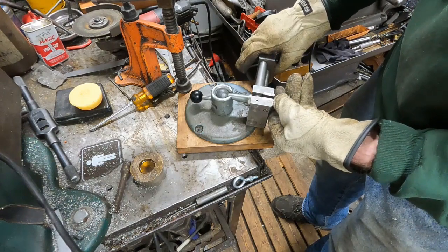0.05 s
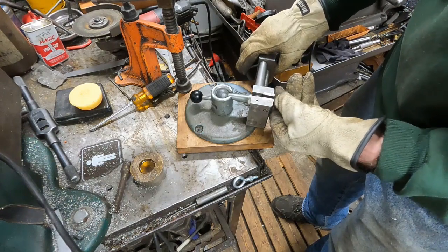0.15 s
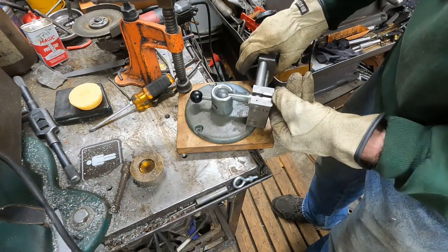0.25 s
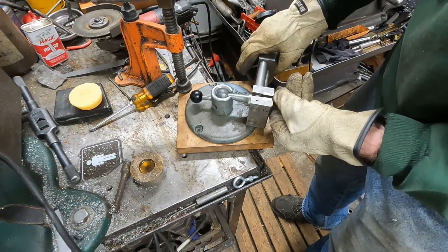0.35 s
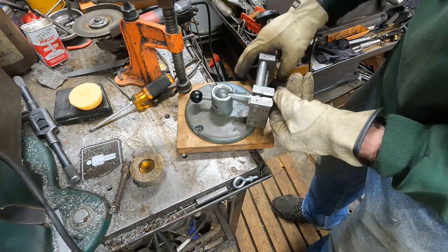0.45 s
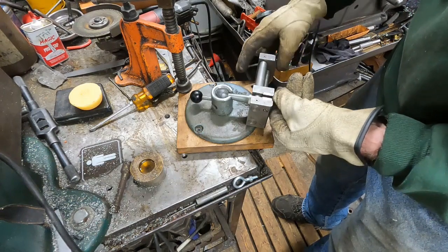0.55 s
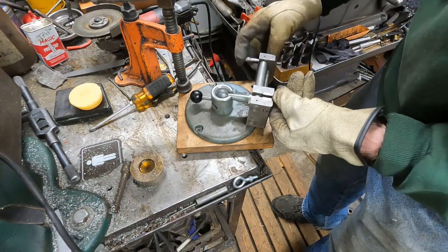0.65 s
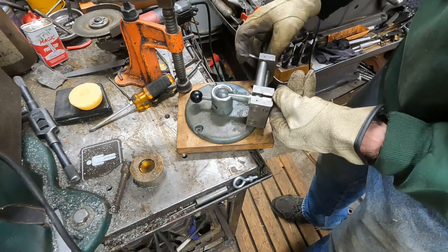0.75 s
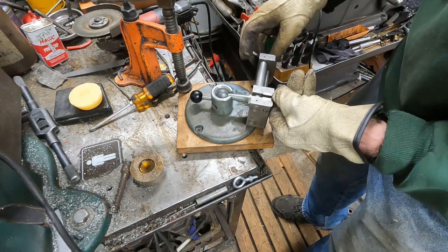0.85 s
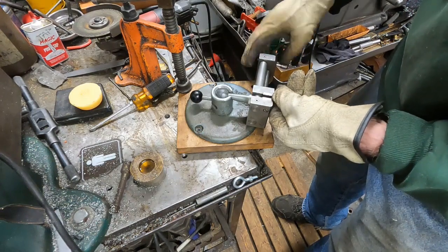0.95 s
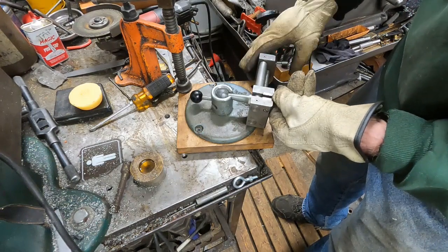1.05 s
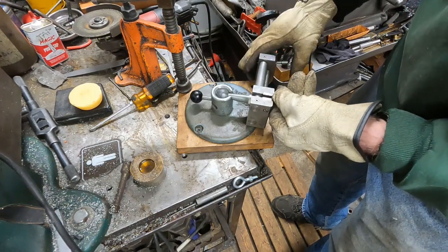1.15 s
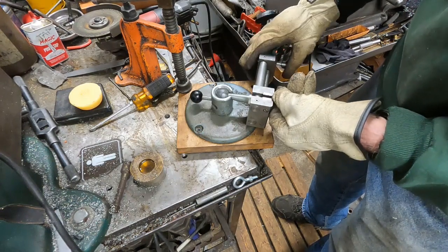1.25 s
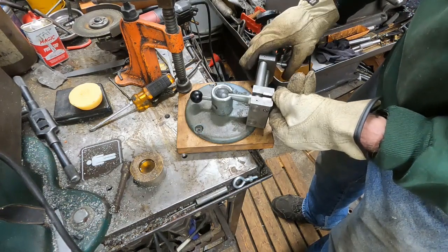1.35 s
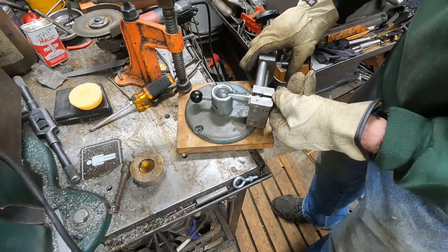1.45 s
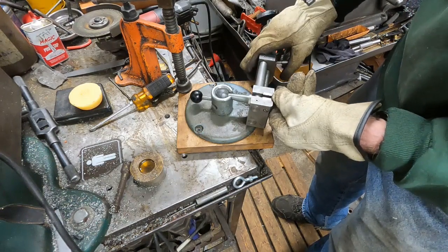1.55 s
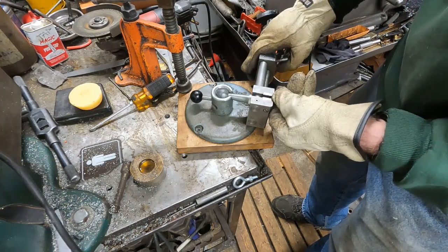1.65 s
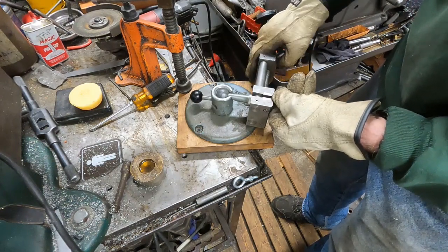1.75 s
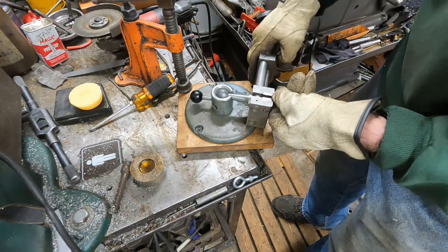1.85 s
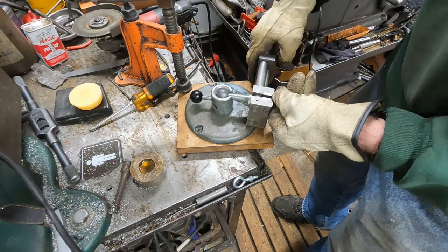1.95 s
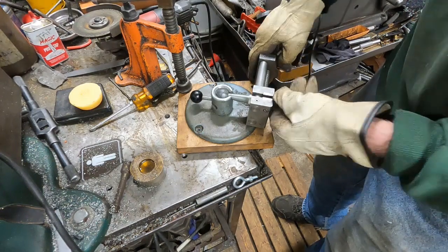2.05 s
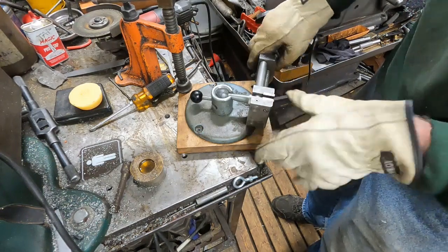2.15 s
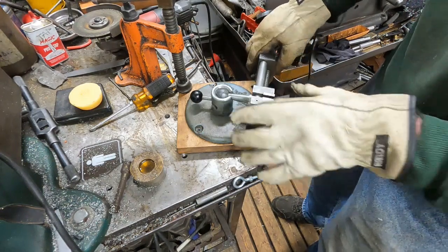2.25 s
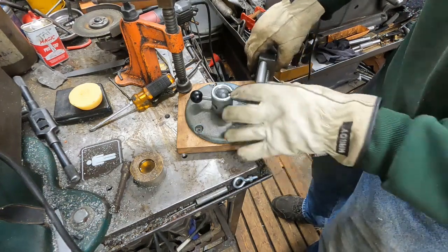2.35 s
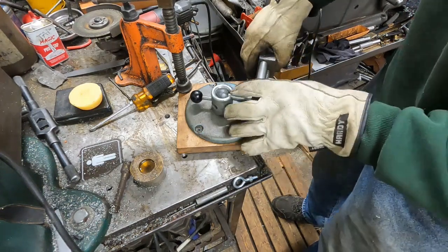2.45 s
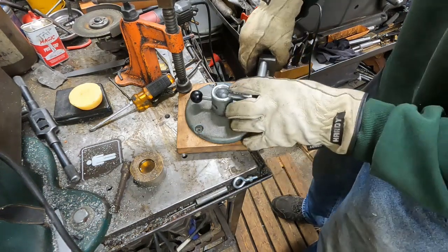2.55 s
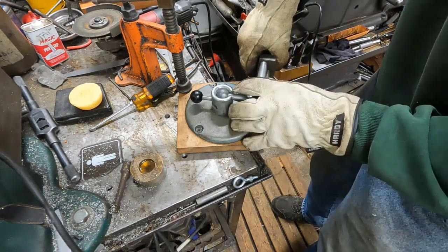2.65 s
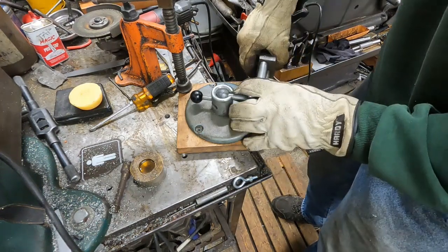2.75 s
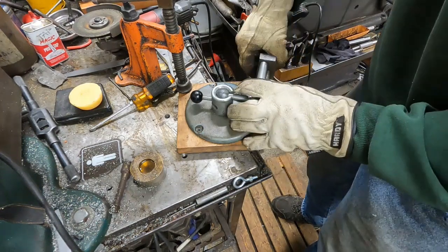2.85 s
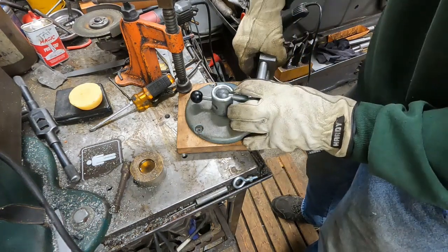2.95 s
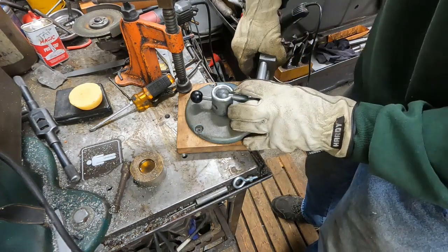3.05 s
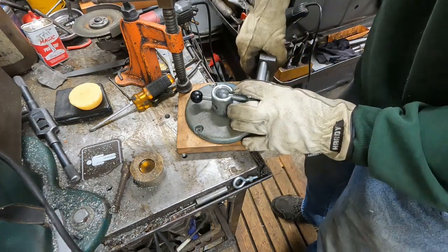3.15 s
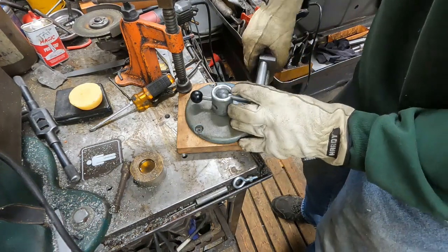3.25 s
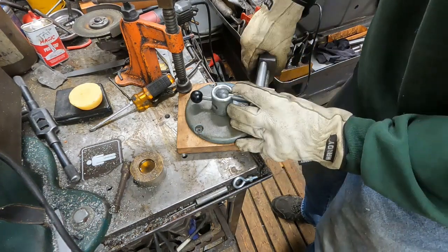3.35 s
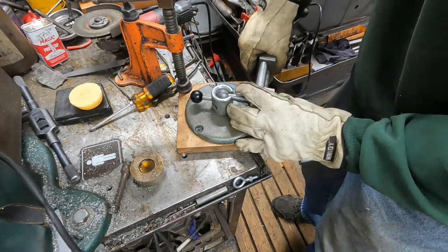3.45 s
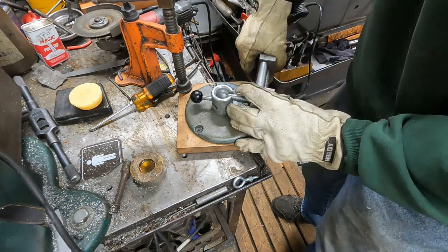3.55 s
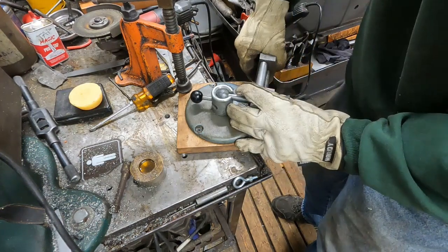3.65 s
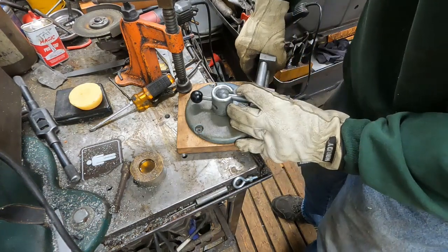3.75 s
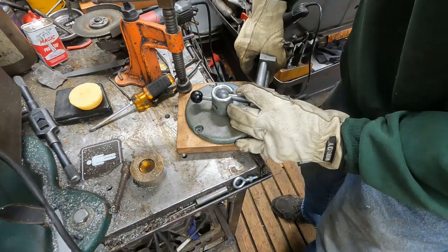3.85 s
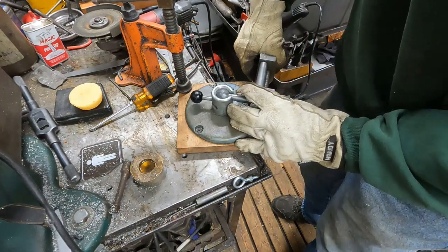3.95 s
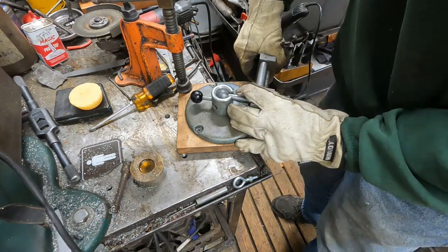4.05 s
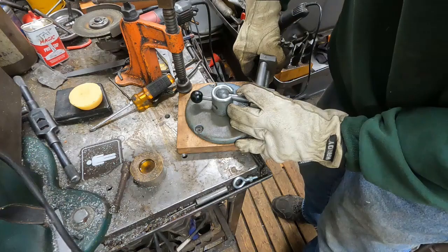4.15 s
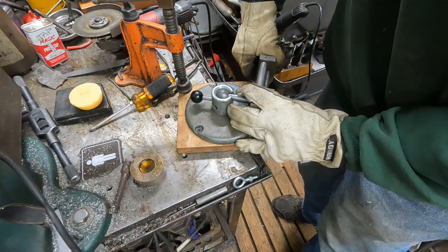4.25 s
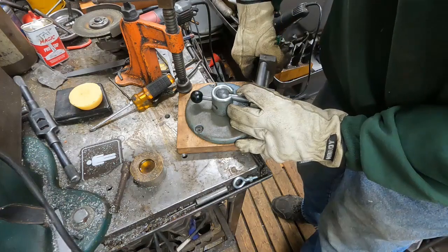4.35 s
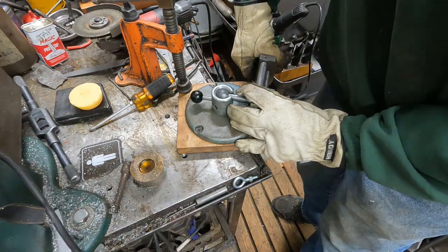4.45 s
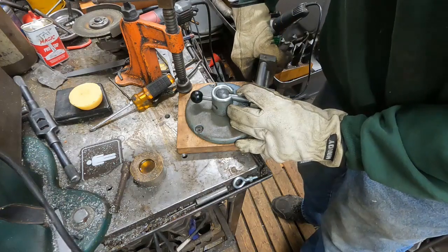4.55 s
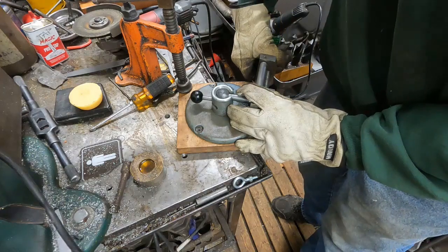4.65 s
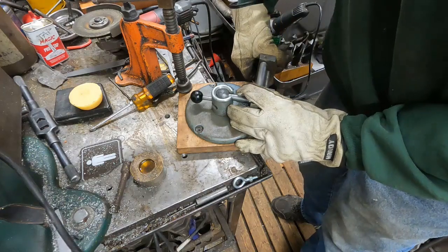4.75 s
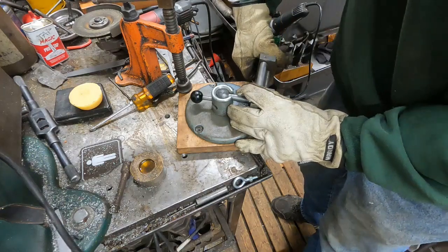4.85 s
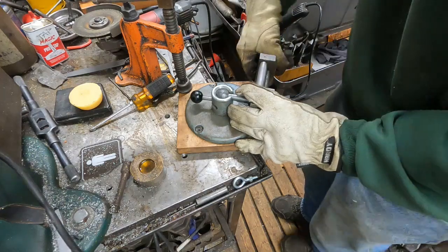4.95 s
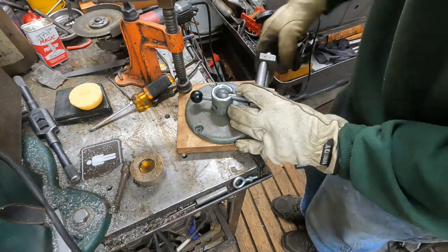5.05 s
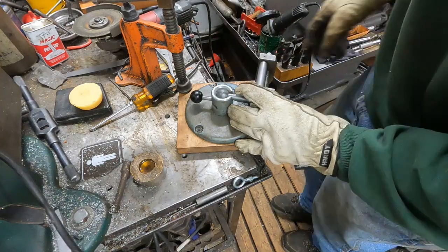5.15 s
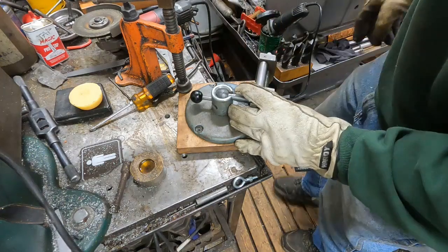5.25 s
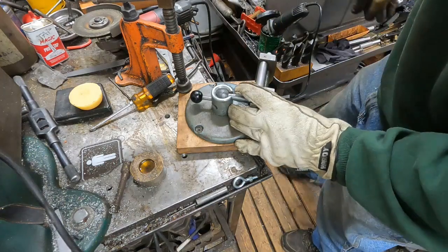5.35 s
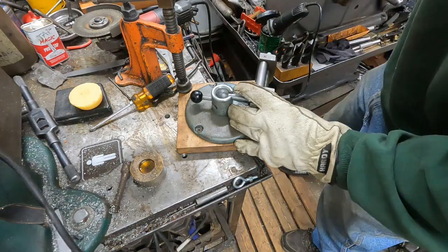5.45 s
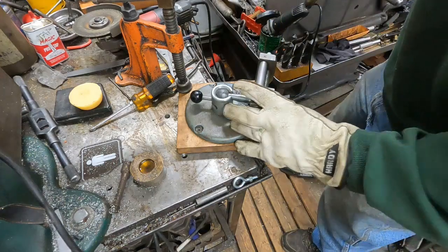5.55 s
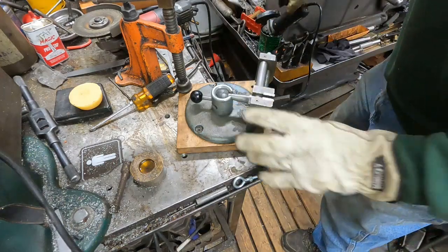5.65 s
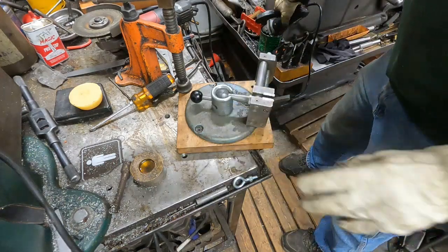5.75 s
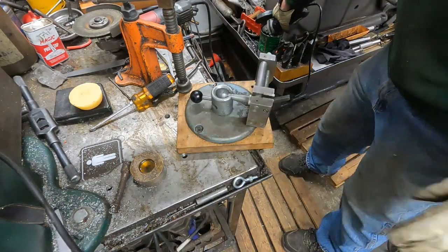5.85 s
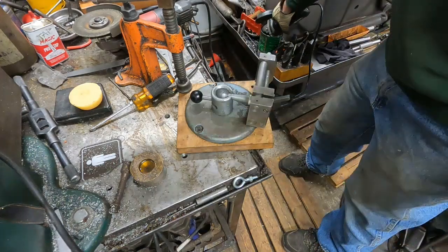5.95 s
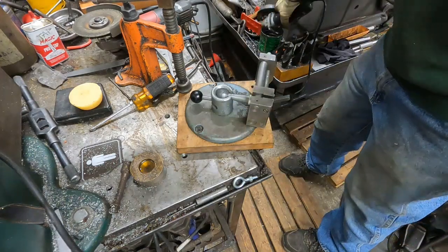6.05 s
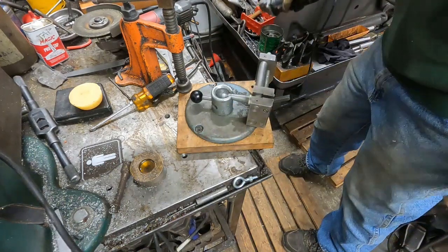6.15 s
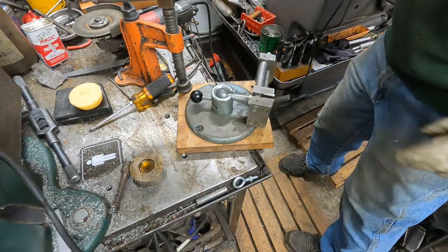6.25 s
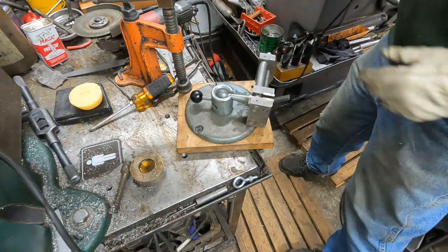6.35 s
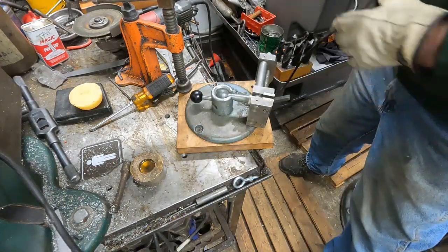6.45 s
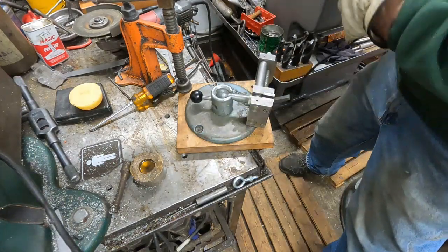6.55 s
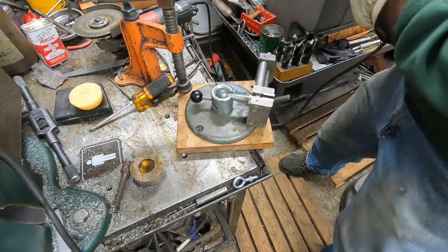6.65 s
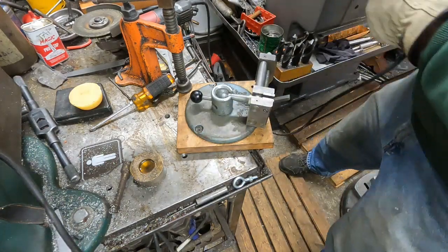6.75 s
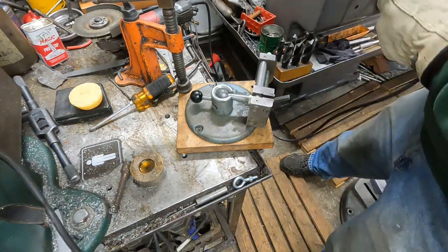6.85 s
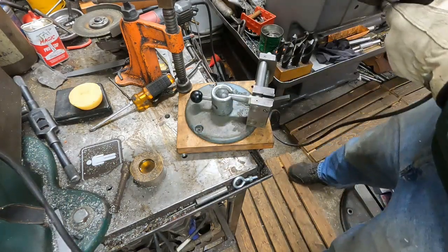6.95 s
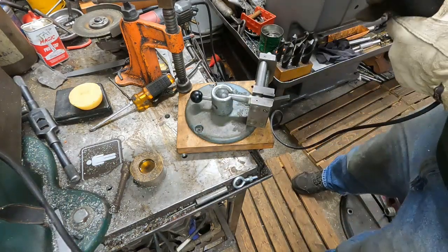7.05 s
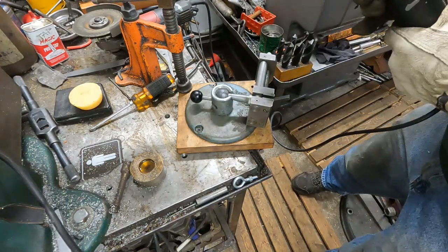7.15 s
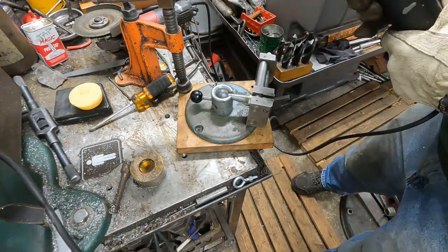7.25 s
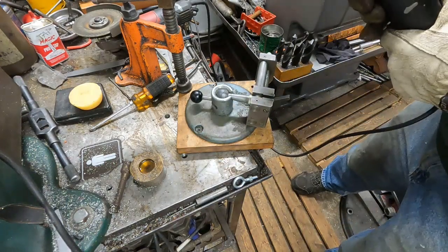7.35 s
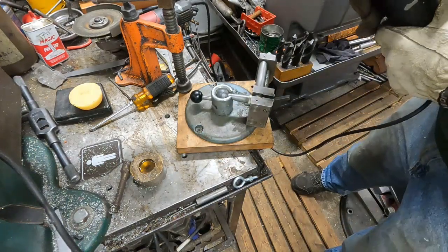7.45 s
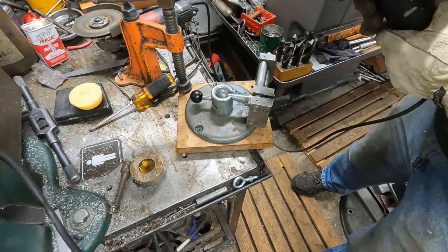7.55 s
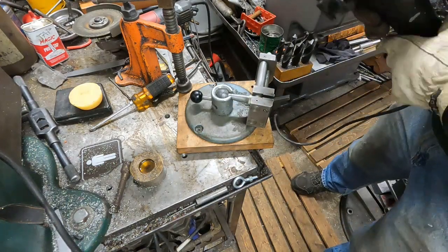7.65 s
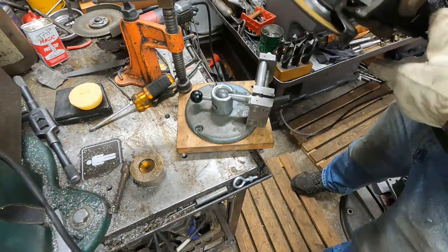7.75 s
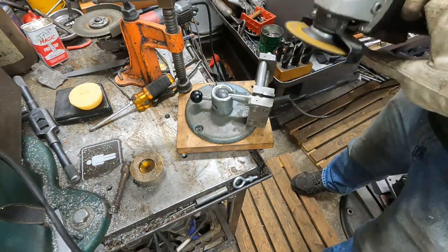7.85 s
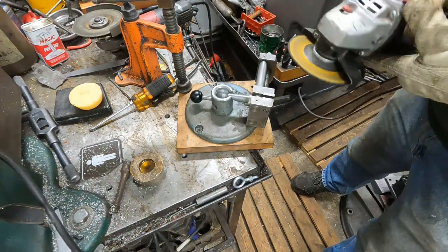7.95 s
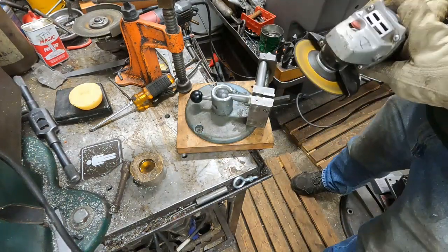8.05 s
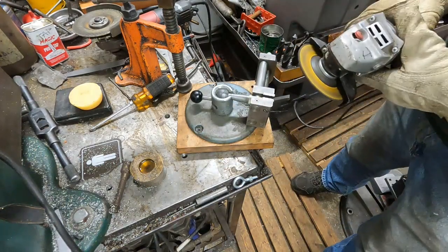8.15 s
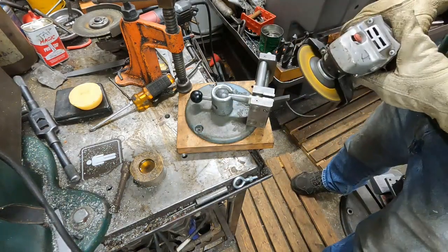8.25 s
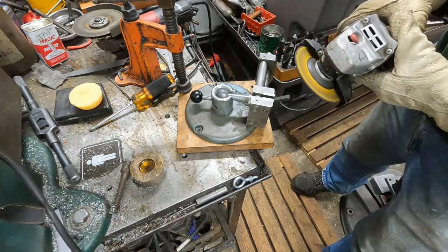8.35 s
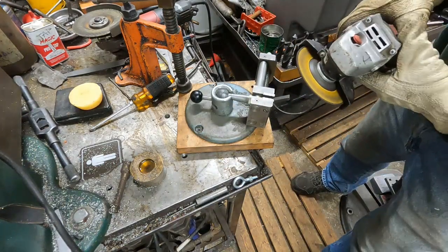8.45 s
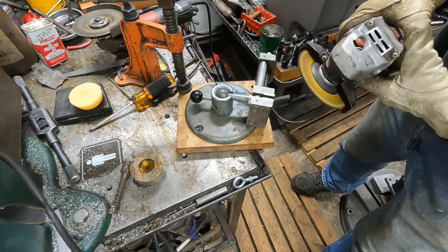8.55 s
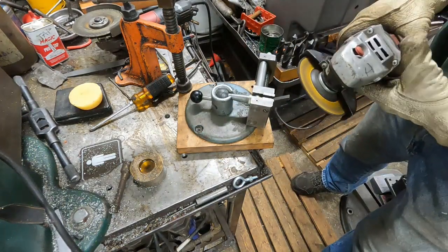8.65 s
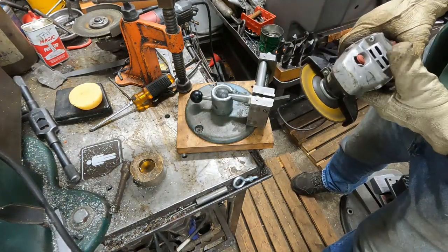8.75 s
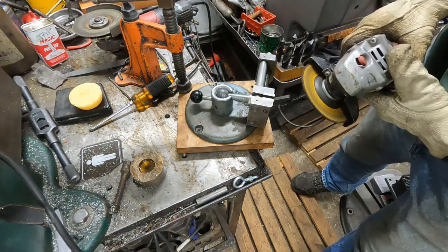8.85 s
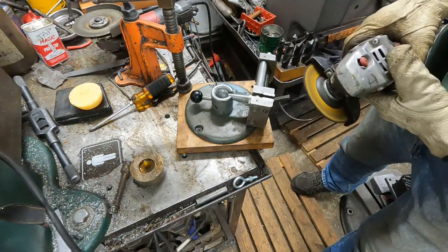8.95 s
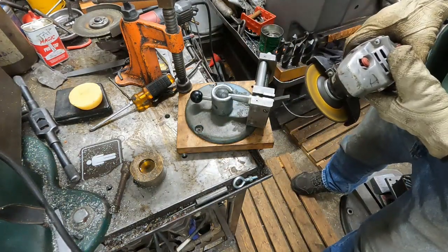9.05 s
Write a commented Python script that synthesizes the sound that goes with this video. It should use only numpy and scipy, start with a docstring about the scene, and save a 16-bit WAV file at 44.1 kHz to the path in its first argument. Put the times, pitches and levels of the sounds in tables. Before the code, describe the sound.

Close stereo microphone in a small, briefly reverberant shop. A bright metal click comes first, then a double clank, light glove friction and faint ticks. Tools clatter against a ringing steel tray while something heavy scrapes free and the bench thumps. A loud switch crack follows, and an unloaded angle grinder spins up, its whine rising and fading into steady fan roar and rattle, with a low wind thump.

```python
"""A fan hums and air buffets the microphone as gloved hands set a steel fixture, which clicks and then rings.
Tools knock and a steel tray rings as an angle grinder is lifted out: struck modes and bursts of noise.
The grinder is switched on and runs up: gear mesh whine, mains-pulsed rattle, fan roar, disc unbalance.
Filtered noise makes the rubbing, booming boards, room and air."""
import sys
import numpy as np
from scipy import signal
from scipy.fft import rfft, irfft, next_fast_len
from scipy.io import wavfile
from scipy.ndimage import uniform_filter1d

SR = 44100
rng = np.random.default_rng(int(sys.argv[2]) if len(sys.argv) > 2 else 0)


def store_pcm(level_fs):
    """Save levels as 16-bit WAV."""
    pcm = np.round(np.clip(level_fs, -1, 1) * 32767).astype(np.int16)
    wavfile.write(sys.argv[1], SR, np.atleast_2d(pcm).T)


N = 401751
TIME = np.arange(N) / SR
SWITCH_ON_S = 7.19
FULL_TURNS_HZ, GEAR_TEETH = 171, 37   # disc turns per second, mesh cycles per turn

# stereo background, left-right likeness: (frequency [Hz], likeness [0-1])
ROOM_LIKENESS = [(100, 0.81), (1000, 0.28), (10000, 0.65)]
# stereo background, left over right: (frequency [Hz], level difference [dB])
ROOM_LEAN = [(100, -8.5), (600, 6), (2000, 0.5), (10000, 0.5)]


def from_db(db):
    """Gain of a level."""
    return 10 ** (np.asarray(db) / 20)


def rms_one(x):
    """Scaled to rms 1."""
    return x / np.sqrt(np.mean(x ** 2) + 1e-20)


def at_hz(points, hz):
    """A spectrum read on a log-frequency axis."""
    point_hz, values = np.transpose(points)
    return np.interp(np.log(hz), np.log(point_hz), values)


def band(x, low_hz, high_hz):
    """Butterworth band-pass."""
    return signal.sosfilt(signal.butter(2, [low_hz, high_hz], "band", fs=SR, output="sos"), x)


def drift(rate, size=N):
    """Slow chance of rms 1, through two random knots per cycle of the rate [Hz]."""
    knots = rng.standard_normal(int(size / SR * 2 * rate) + 2)
    return rms_one(np.interp(np.linspace(0, len(knots) - 1, size), np.arange(len(knots)), knots))


def resonance(x, hz, width_hz):
    """Two-pole peak of gain 1."""
    r = np.exp(-np.pi * width_hz / SR)
    poles = [1, -2 * r * np.cos(2 * np.pi * hz / SR), r * r]
    return signal.lfilter([(1 - r * r) / 2, 0, (r * r - 1) / 2], poles, x)


def coloured(spectrum, likeness, lean, patchy_db, size=N):
    """Stereo noise with a spectrum, left-right likeness and lean per frequency, flickering; rms 1."""
    padded = next_fast_len(size)
    hz = np.maximum(np.arange(padded // 2 + 1) * SR / padded, 1)
    flicker = from_db(patchy_db * drift(18, padded))
    mid, side = rfft(rng.standard_normal((2, padded)) * flicker)
    alike = np.clip(at_hz(likeness, hz), 0, 1)
    pair = np.sqrt(1 + alike) * mid + np.sqrt(1 - alike) * side * [[1], [-1]]
    shape = from_db(at_hz(spectrum, hz) + at_hz(lean, hz) * [[.5], [-.5]])
    return rms_one(irfft(pair * shape, padded)[:, :size])


def swells(rows, source, skew=0.59):
    """Each row lets a sound rise and sink, the rise quicker for skew under 1; source(size, Hz) makes it."""
    out = np.zeros((2, N + SR))
    for s, length, level_db, hz in rows:
        share = np.linspace(0, 1, round(length * SR))
        shape = np.sin(np.pi * share ** skew)
        sound = from_db(level_db) * shape * rms_one(source(len(share), hz))
        out[:, round(s * SR):][:, :len(share)] += sound
    return out[:, :N]


def grinder():
    """Torque pulses at twice mains shake the gears while the motor pulls; the disc throbs once a turn."""
    # the disc falls short of full speed by a quick and a slow part: (turn rate short [Hz], time constant [s])
    run_up = [(38, .1), (106, .5)]
    # the roar dips briefly: (time [s], half width [s], level [dB])
    dips = [(7.659, 0.0074, -7.5), (8.506, 0.0089, -4.5)]
    start = round(SWITCH_ON_S * SR)
    t, size = TIME[start:], N - start
    running = t - SWITCH_ON_S
    turns = FULL_TURNS_HZ - sum(short * np.exp(-running / lag) for short, lag in run_up)
    speed = turns / FULL_TURNS_HZ
    angle = 2 * np.pi * np.cumsum(turns) / SR

    # the mains throb fades as the motor stops pulling
    throb_fade_s, throb_left = 0.17, 0.21
    throb = np.clip(throb_left + (1 - throb_left) * np.exp(-running / throb_fade_s), 0, 1)
    pulse_hz, pulse_peak_s = 119.7, 7.2335
    pulse_time = t - pulse_peak_s + .0004 * drift(40, size)
    pulse = 2 * np.cos(np.pi * pulse_hz * pulse_time) ** 4 * from_db(1.3 * drift(60, size))
    shake = (1 - throb + throb * pulse) * (1 + 0.051 * np.cos(angle))

    fan, rattle = fan_and_rattle(t, speed, angle)
    tones = shake * (gear_whine(running, turns, angle) + housing_ring(t, turns)) + disc_unbalance(speed, angle)
    sound = shake * fan + (0.44 + 0.56 * shake) * rattle + tones * from_db([[-.9], [.9]])
    dip_db = sum(level_db * np.exp(-((t - s) / half) ** 2) for s, half, level_db in dips)
    onset = np.minimum(running / 0.0087, 1)
    return np.pad(sound * from_db(dip_db) * onset, ((0, 0), (start, 0)))


def fan_and_rattle(t, speed, angle):
    """Running noise rings case and guard; the fan below 1800 Hz grows more steeply with speed than the rattle."""
    # running noise: (frequency [Hz], relative level per Hz [dB])
    spectrum = [(120, -14.5), (200, -9.5), (331, -5.5), (411, -8), (501, -8.5), (589, -11), (1010, -1),
                (4930, 7.5), (7600, 5), (8400, -2.5), (11500, -5), (13300, -16), (14800, -10)]
    # left-right likeness: (frequency [Hz], likeness [0-1])
    likeness = [(200, 0.96), (600, 0.84), (2000, 0.73), (5000, 0.85), (8000, 0.67), (13000, 0.37)]
    # left over right: (frequency [Hz], level difference [dB])
    lean = [(200, 0.5), (1500, -1.5), (4000, -2.5), (12000, 1)]
    # gear case and guard, rung by the noise: (frequency [Hz], width [Hz], level [dB])
    case = [(1040, 22, 0), (1150, 23, -1.5), (1280, 40, -2), (1647, 22, 0.5), (2170, 27, -2),
            (2640, 37, -2), (2980, 45, -4), (4970, 60, -1.5)]
    # broad zones that come and go as the grinder turns in the hands: (frequency [Hz], width [Hz], level [dB])
    guard = [(2830, 1640, -2.5)]
    # brief swells of narrow bright bands in the running noise:
    # (time [s], half width [s], frequency [Hz], width [Hz], level [dB])
    bright_swells = [(7.42, 0.061, 7240, 410, -3), (7.61, 0.026, 6060, 300, 1), (7.72, 0.074, 5260, 150, 0),
                     (8.12, 0.083, 4450, 300, 0)]
    size = len(t)
    noise = coloured(spectrum, likeness, lean, patchy_db=0.5, size=size)
    for zones, wander_db, rate in [(case, 1.5, 9), (guard, 0.8, 4.5)]:
        noise = noise + sum(from_db(level_db + wander_db * drift(rate, size)) * resonance(noise, hz, width)
                            for hz, width, level_db in zones)
    noise = noise + sum(from_db(level_db) * np.exp(-((t - s) / half) ** 2) * resonance(noise, hz, width)
                        for s, half, hz, width, level_db in bright_swells)
    low = signal.sosfilt(signal.butter(3, 1800, fs=SR, output="sos"), noise)
    high = signal.sosfilt(signal.butter(3, 1800, "high", fs=SR, output="sos"), noise)
    # levels at full speed before the shake [dB], and powers of speed
    fan_db, fan_power, rattle_db, rattle_power = -24.5, 2.53, -20.5, 0.36
    fan = from_db(fan_db) * rms_one(low) * speed ** fan_power
    rattle = from_db(rattle_db) * rms_one(high) * speed ** rattle_power
    # the armature turns faster than the disc and throbs in the rattle
    pinion_teeth, armature_throb = 11, .2
    return fan, rattle * (1 + armature_throb * np.cos(angle * GEAR_TEETH / pinion_teeth))


def gear_whine(running, turns, angle):
    """The mesh tone rises with the disc and weakens as the load falls."""
    # the casing colours the rising tone: (frequency [Hz], width [Hz], level [dB])
    lifts = [(1200, 400, -20), (2200, 500, 7), (3500, 400, 6), (4500, 300, 2), (5030, 130, 1),
             (5600, 350, -10)]
    size = len(running)
    lift_db = sum(level_db / (1 + ((GEAR_TEETH * turns - hz) / width) ** 2) for hz, width, level_db in lifts)
    loaded_db, fade_db_per_s, left_db = -23, 12, -38
    level_db = np.maximum(loaded_db - fade_db_per_s * running, left_db) + lift_db
    # worn teeth scatter the mesh tone into a band, and the uneven wheel splits it into strands
    mesh = GEAR_TEETH * angle + 1.2 * drift(240, size) + .6 * np.sin(angle)
    whine = (np.sin(mesh) + .25 * np.sin(2 * mesh)) * (.95 + .3 * drift(250, size))
    return from_db(level_db) * whine


def housing_ring(t, turns):
    """A narrow band of noise: the starting jolt rings the housing, and so does the mesh tone passing by."""
    housing_hz, housing_width_hz = 3640, 200
    jolt_s, jolt_length_s, jolt_db = 7.245, 0.043, -25
    passing_hz, passing_width_hz, passing_db = 3770, 550, -24.5
    steady_db = -46
    jolt = from_db(jolt_db) * np.exp(-((t - jolt_s) / jolt_length_s) ** 2)
    passing = from_db(passing_db) / (1 + ((GEAR_TEETH * turns - passing_hz) / passing_width_hz) ** 2)
    once = resonance(rng.standard_normal(len(t)), housing_hz, housing_width_hz)
    housing = rms_one(resonance(once, housing_hz, housing_width_hz))
    return (jolt + passing + from_db(steady_db)) * housing


def disc_unbalance(speed, angle):
    """The uneven disc pushes at multiples of its turn rate, harder with speed."""
    # (multiple of the turn rate, relative level [dB])
    orders = [(1, 7), (2, -3), (3, 2.5), (4, 0.5), (6, -2), (7, -17)]
    size = len(angle)
    tone = sum(from_db(level_db + 1.6 * drift(10, size)) * np.sin(k * (angle + 0.38 * drift(20, size)))
               for k, level_db in orders)
    return np.sqrt(2) * from_db(-47.5) * speed ** 3 * tone


def knocks():
    """Steel, tools and faint loose parts struck as noise bursts; direct sound and what the room receives."""
    # steel and tools, from the fixture to the grinder's switch: (time [s], level [dB], low body over level [dB],
    # treble over level [dB], rattle t60 [s], voice [Hz], share sent to the room [dB])
    struck = [(0.7681, -9.5, -24, -0.5, 0.02, 1990, -8.5), (0.769, -15, -2.5, -29, 0.017, 1360, -1.5),
              (2.2064, -14.5, -11, -8, 0.042, 1210, -0.5), (2.2782, -12, -6, -3.5, 0.018, 2170, -1.5),
              (3.4027, -23.5, -11, -3, 0.055, 1410, -4), (3.9952, -23.5, -20, -17, 0.067, 1340, -0.5),
              (4.796, -18, -11.5, -16, 0.073, 1430, -1.5), (4.8781, -22, -1.5, -39, 0.046, 1400, -3),
              (4.9307, -22, -3, -38, 0.077, 1400, -11), (5.0045, -32, 11, -9, 0.066, 1500, -8.5),
              (5.1193, -20.5, -5, -2, 0.092, 1750, -1), (5.5889, -35.5, 13.5, -9.5, 0.078, 1890, 2),
              (5.859, -28.5, -17, -4, 0.34, 1680, 2), (6.136, -22.5, 5.5, -10, 0.12, 960, -1),
              (6.1465, -24.5, 5, 2, 0.21, 940, -9.5), (6.428, -22, -9, -20, 0.35, 1350, -1.5),
              (6.4454, -13.5, -6.5, -8.5, 0.18, 1510, -1.5), (6.6294, -20.5, -21, -22, 0.031, 1800, 7),
              (6.6481, -13.5, -9, -9, 0.079, 1820, -2), (6.76, -26.5, 5.5, -8, 0.031, 1210, 0),
              (6.8983, -37, 0, -26, 0.13, 1210, 0), (7.0028, -35, 0, -8, 0.09, 1390, 4),
              (7.18, 3.5, -3.5, -8, 0.019, 3850, 0.5), (7.1812, -6.5, 0, -31, 0.068, 2840, -1)]
    # faint ticks of loose parts: (time [s], level [dB], treble over level [dB])
    loose = [(2.1552, -40, 1), (2.165, -36, -13), (2.823, -37.5, -34), (3.219, -60, 8), (3.336, -35, -6),
             (3.4513, -39, -20), (3.76, -46, -8), (3.8983, -56.5, 6.5), (4.561, -49.5, 0), (5.428, -43, -5),
             (5.832, -38.5, -6), (6.6, -42, 1)]
    body_db, t60_s, voice_hz = 1, 0.027, 1430
    ticks = [(s, level_db, body_db, treble_db, t60_s, voice_hz, 0) for s, level_db, treble_db in loose]
    return blows(struck + ticks, pan_db=1.3)


def blows(rows, pan_db):
    """Each blow: a crack and a dying rattle in body, middle and treble, direct and as sent to the room."""
    contact_s = .001   # from first touch to the crack
    # harder blows are brighter and crack more: crack over rattle [dB], dB per dB of treble
    crack_db, crack_follows_treble = 10, .15
    out, t = np.zeros((2, N + SR)), np.arange(SR // 3) / SR
    click = 1.0 * (t == 0)
    for s, level_db, body_db, treble_db, t60, voice_hz, room_db in rows:
        rattle = from_db(-60 * t / max(t60, .005)) * (1 - np.exp(-t / 0.00021))
        # the body swells later and lasts
        body = from_db(-25 * t / max(t60, .005)) * (1 - np.exp(-t / 0.0087))
        shapes = np.array([body, rattle, 0.27 * rattle])
        cracks = from_db(crack_db + crack_follows_treble * treble_db) * click * [[0], [1], [.8]]
        direct = rng.standard_normal((3, len(t))) * shapes + cracks
        # the room receives a smooth click with the energy of the blow
        energy = np.sum(shapes ** 2 + cracks ** 2, axis=1, keepdims=True)
        room_click = from_db(room_db) * click * np.sqrt(energy)
        low, mid, high = np.stack([direct, room_click], axis=1)
        voiced = 0.64 * band(band(mid, 920, 3080), 300, 12500)
        voiced = voiced + 0.91 * resonance(mid, voice_hz, width_hz=270)
        voiced = voiced + 0.45 * resonance(mid, voice_hz, width_hz=110)
        bright = band(high, 3240, 6700) + 1.84 * resonance(high, 5170, width_hz=1870)
        sound = from_db(body_db) * band(low, 296, 900) + voiced - from_db(treble_db) * bright
        out[:, round((s + contact_s) * SR):][:, :len(t)] += from_db(level_db) * sound
    return out[:, None, :N] * from_db([[pan_db / 2], [-pan_db / 2]])


def ringing_bodies():
    """Casting, tray, tool handle, bar and bench ring in decaying modes."""
    # modes of each body: (frequency [Hz], level [dB], t60 [s]); its hits: (time [s], level [dB])
    # the arm drops on its stop and the casting rings
    casting = [(239.7, -6.5, 0.42), (276, -9, 0.22), (700, -13.5, 0.24), (968, -19, .2), (977, -9, 0.3),
               (1165, -20, .2), (1590, -15, .15), (1793, -6, 0.19), (2010, -16.5, 0.15), (1980, -13.5, .15),
               (2160, 7, 0.04), (2498, 2.5, 0.028), (2542, 4, 0.076), (5120, 10, 0.015)]
    clanks = [(2.27, -41), (2.273, -46), (2.278, -31.5), (2.28, -26.5)]
    # the grinder knocks the steel tray under the tools
    tray = [(284, -4.5, 0.45), (510, -9, 0.62), (934, 0, 0.58), (1110, -7, 0.34), (1370, 3.5, 0.22),
            (1420, -11, 0.2), (1540, -5, .25), (1870, 3, 0.21), (2090, 0, 0.35), (2620, 0, 0.18)]
    tray_hits = [(6.43, -44), (6.447, -36), (6.455, -36), (6.63, -41), (6.65, -58)]
    # a tool handle knocks the bench
    handle = [(1160, 1, 0.015), (755, -14, 0.22)]
    handle_hit = [(5.0057, -25.5)]
    # a short bar knocks
    bar = [(1707, 0, .035)]
    bar_hit = [(5.8615, -19)]
    # a hand lands on the bench top
    bench = [(234, 0.5, 0.16), (395, -2, 0.074)]
    bench_hit = [(5.5896, -31)]
    steel = ring(clanks, casting, 1.5) + ring(tray_hits, tray, 3)
    return steel + ring(handle_hit, handle, 1) + ring(bar_hit, bar, 1) + ring(bench_hit, bench, 1)


def ring(hits, modes, spread_db):
    """Every hit strikes the modes of a body with strengths of its own."""
    seconds, hit_db = np.transpose(hits)
    at = np.round(seconds * SR).astype(int)
    luck = rng.normal(0, spread_db, (len(hits), len(modes)))
    out = np.zeros(N)
    for (hz, level_db, t60), chance_db in zip(modes, luck.T):
        clicks = np.full(N, 1e-18)
        clicks[at] = from_db(hit_db + level_db + chance_db)
        r, w = from_db(-60 / (t60 * SR)), 2 * np.pi * hz / SR
        out += signal.lfilter([0, np.sin(w)], [1, -2 * r * np.cos(w), r * r], clicks)
    return out


def fixture_snap():
    """The first click of the fixture has a thin, very bright edge: a band-passed impulse."""
    snap_s, snap_db = .7692, -7.5
    impulse = from_db(snap_db) * (np.arange(N) == round(snap_s * SR))
    return band(impulse + 1e-18, 8000, 14500)


def shop(x):
    """The cluttered room answers with dense noise that dies band by band, largely alike left and right."""
    # bands of the answer: (frequency [Hz], t60 [s], relative level [dB])
    bands = [(235, 0.86, -11), (720, 0.49, -16.5), (1800, 0.32, -11.5), (5430, 0.35, -14.5),
             (10440, 0.069, -34)]
    answer_db = -19.5
    t, answer = np.arange(SR // 2) / SR, 0
    for hz, t60, level_db in bands:
        shared, own = rng.standard_normal(len(t)), rng.standard_normal((2, len(t)))
        noise = band(shared + .5 * own, hz / 1.76, min(hz * 1.89, .45 * SR))
        tail = noise * from_db(-60 * t / t60) * np.minimum(t / 0.0057, 1)
        answer = answer + tail * from_db(level_db + answer_db)
    return signal.fftconvolve(x, answer, axes=1)[:, :N]


def handling():
    """Gloves rub, the grinder drags, cloth rustles unevenly and boards boom."""
    # gloves on fixture and grinder: (time [s], length [s], level [dB], brightest zone [Hz])
    rubs = [(0.24, 0.09, -54.5, 4070), (0.51, 0.09, -52.5, 2200), (0.615, 0.081, -55.5, 3800),
            (0.706, 0.14, -49, 4280), (1.05, 0.062, -53, 2100), (1.07, 0.083, -61.5, 4000),
            (1.766, 0.11, -60.5, 3600), (2.448, 0.32, -60, 3780), (2.68, 0.58, -62, 3820),
            (3.262, 0.17, -54.5, 4530), (5.05, 0.11, -39.5, 4100), (5.656, 0.082, -52.5, 3640),
            (7.038, 0.16, -42, 3840)]
    # the grinder and its cable dragged over tools: (time [s], length [s], level [dB])
    drag_rows = [(6.088, 0.28, -52), (6.256, 0.11, -48.5), (6.55, 0.14, -45), (6.676, 0.12, -51),
                 (6.837, 0.22, -61), (6.998, 0.69, -45)]
    # sleeves and gloves moving: (time [s], level [dB])
    rustle_levels = [(0, -102), (2.0, -71.5), (2.6, -64), (3.2, -73), (3.5, -64.5), (4.7, -74.5),
                     (5.0, -48.5), (5.6, -61), (6.4, -53), (7.3, -52.5)]
    # boards and bench booming under moving weight: (time [s], length [s], level [dB], frequency [Hz])
    booms = [(2.29, 0.17, -49.5, 149), (2.3, 0.065, -42, 243), (5.04, 0.19, -47.5, 139),
             (5.88, 0.21, -53, 134), (6.14, 0.12, -43, 139), (6.44, 0.16, -40, 323),
             (6.555, 0.28, -42, 134), (6.678, 0.18, -41.5, 141), (7.115, 0.22, -34.5, 128)]
    rustle_hz, drag_hz = 3600, 2500   # brightest zones
    drags = [(*row, drag_hz) for row in drag_rows]
    seconds, levels_db = np.transpose(rustle_levels)
    rustle_db = np.interp(TIME, seconds, levels_db) + 2.2 * drift(6)
    rustle = from_db(rustle_db) * rms_one(rub(N, rustle_hz))
    return swells(rubs, rub, skew=0.88) + swells(drags, rub) + rustle + swells(booms, boom)


def rub(size, hz):
    """Grainy friction hiss with a broad bright zone."""
    # (frequency [Hz], relative level per Hz [dB])
    colour = [(700, 1), (1400, 14.5), (3000, -2), (7000, -2), (12000, -18), (14500, -27.5)]
    # about 400 grains per second
    grit = 1 + 21.0 * (rng.random(size) < 400 / SR) * rng.random(size)
    hiss = coloured(colour, ROOM_LIKENESS, ROOM_LEAN, patchy_db=3.0, size=size)
    hiss = hiss * from_db(0.36 * drift(110, size)) * uniform_filter1d(grit, size=30)
    return hiss + 2.2 * resonance(hiss, hz, width_hz=1000)


def boom(size, hz):
    """Noise in one board resonance."""
    return resonance(resonance(rng.standard_normal(size), hz, width_hz=28), hz, width_hz=830)


def background():
    """Broad room noise, the narrow hum bands of a fan, and air on the microphone ports."""
    # room noise: (frequency [Hz], relative level per Hz [dB])
    floor = [(76, -81), (130, -6.5), (302, -7.5), (438, -10), (483, -2.5), (512, -7), (599, 0), (977, -16),
             (1420, -13.5), (1940, -22), (2270, -28.5), (14000, -50)]
    # fan: (frequency [Hz], width [Hz], level [dB])
    hum_bands = [(242.5, 3, -66.5), (598, 58, -65.5), (738.7, 7.3, -66), (1576, 73, -74)]
    # two close motor tones that beat: (frequency [Hz], level [dB])
    beating = [(472.53, -62.7), (479.97, -62.1)]
    # air buffeting the microphone: (time [s], length [s], level [dB], frequency [Hz])
    puffs = [(0.643, 0.49, -66, 33), (1.706, 0.47, -66, 28), (5.05, .25, -67, 45), (5.538, 0.56, -66, 40),
             (6.1, .38, -59, 51), (6.451, 0.34, -56, 60), (7.121, 0.39, -48, 50), (7.511, 0.36, -48, 39),
             (7.768, 0.0377, -22.5, 59), (7.803, 0.11, -30.5, 50), (7.904, 0.29, -44, 39.8)]
    floor_db, still_air_db, still_air_hz = -53, -76.5, 31
    in_step_s = .021   # a moment when the two tones are in step
    room = from_db(floor_db) * coloured(floor, ROOM_LIKENESS, ROOM_LEAN, patchy_db=1.6)
    room = signal.sosfilt(signal.butter(6, 118, "high", fs=SR, output="sos"), room)
    hum = sum(from_db(level_db) * rms_one(resonance(rng.standard_normal(N), hz, width))
              for hz, width, level_db in hum_bands)
    hum = hum + sum(np.sqrt(2) * from_db(level_db) * np.sin(2 * np.pi * hz * (TIME - in_step_s))
                    for hz, level_db in beating)
    air = from_db(still_air_db + 3.0 * drift(2.1)) * rms_one(puff(N, still_air_hz))
    return room + hum * from_db([[1.2], [-1.2]]) + air + swells(puffs, puff)


def puff(size, hz):
    """Lumpy low noise, stronger on the right port."""
    shared, own = rng.standard_normal(size), rng.standard_normal((2, size))
    lumps = band(shared + 0.24 * own, hz / 5.3, hz * 1.7)
    return band(lumps, hz / 3.4, hz * 2.0) * from_db([[-2.2], [2.2]])


def scene():
    """Near blows with their room, handling, the grinder and the background."""
    # the ringing bodies reach the room 9 dB weaker than the direct sound
    struck = knocks() + ringing_bodies() * from_db([0, -9])[:, None, None]
    near, sent = signal.sosfilt(signal.butter(4, 120, "high", fs=SR, output="sos"), struck)
    return near + fixture_snap() + shop(sent) + handling() + grinder() + background()


def record(dry):
    """The right port hears a little earlier, except in the treble; the top is cut."""
    port_lag_s, lag_fades_hz, cutoff_hz = 4e-5, 5500, 15400
    padded = 2 ** 19
    hz = np.fft.rfftfreq(padded, 1 / SR)
    lag = port_lag_s * np.exp(-(hz / lag_fades_hz) ** 2)
    left = irfft(rfft(dry[0], padded) * np.exp(-2j * np.pi * hz * lag))[:N]
    return signal.sosfilt(signal.cheby2(10, 60, cutoff_hz, fs=SR, output="sos"), np.array([left, dry[1]]))


dry = scene()
out = record(dry)
store_pcm(out)
```